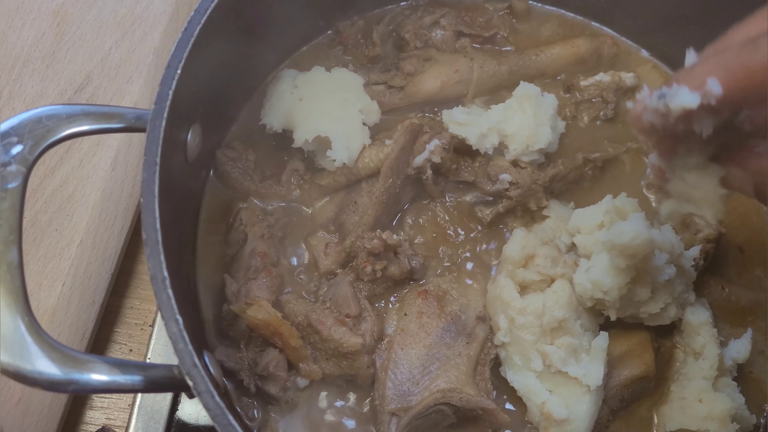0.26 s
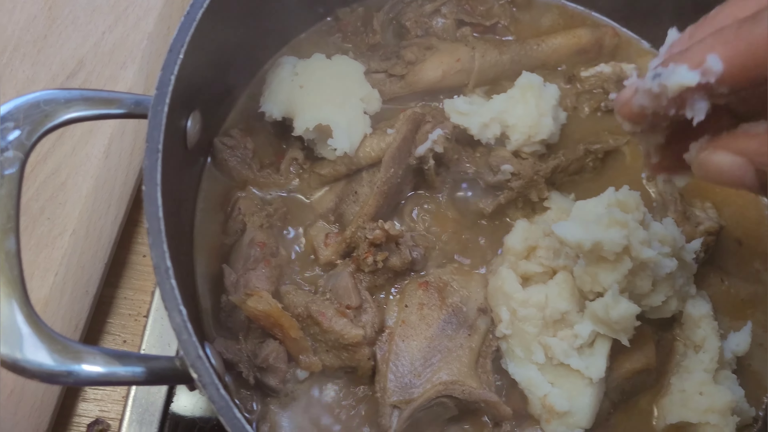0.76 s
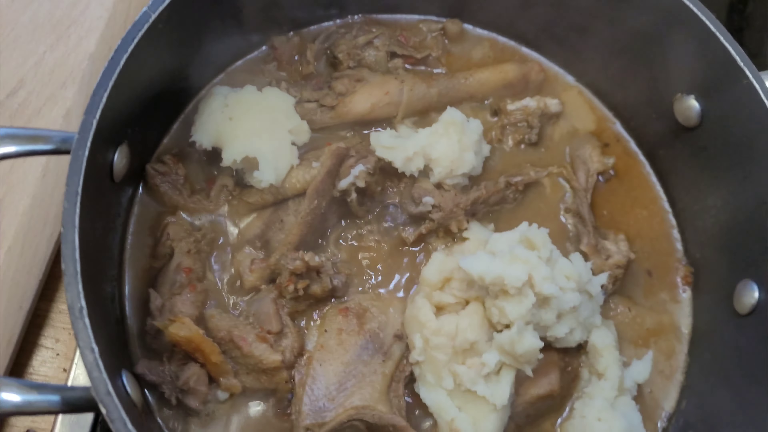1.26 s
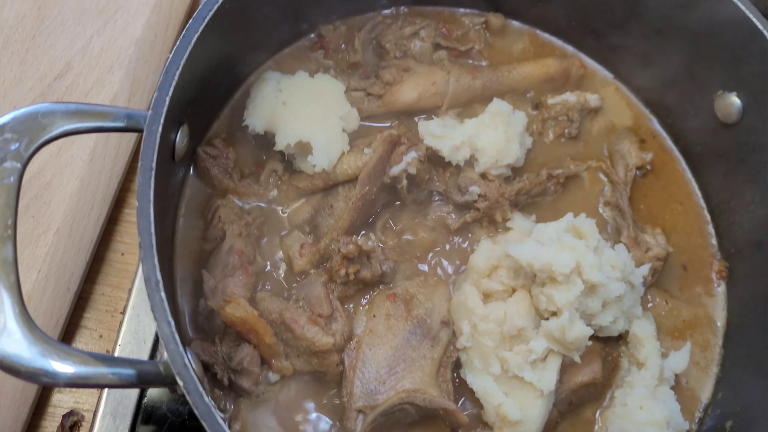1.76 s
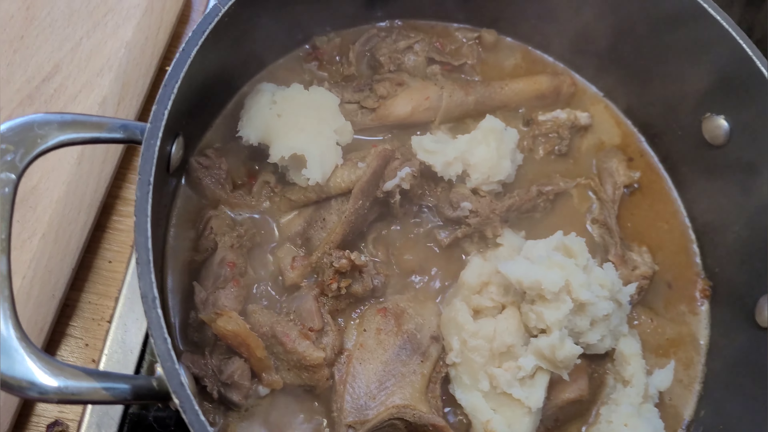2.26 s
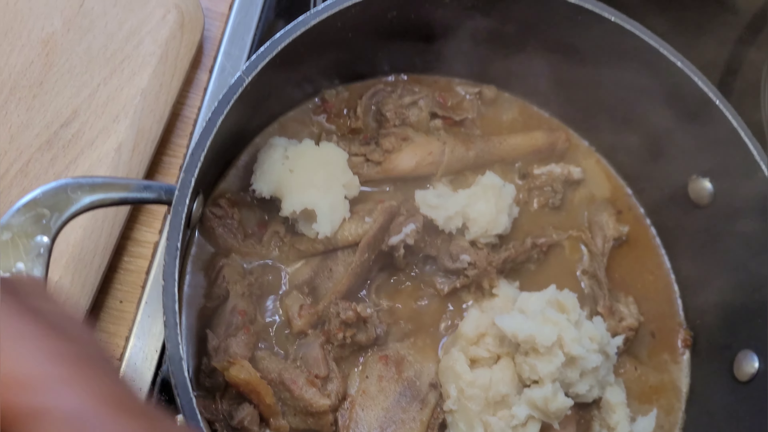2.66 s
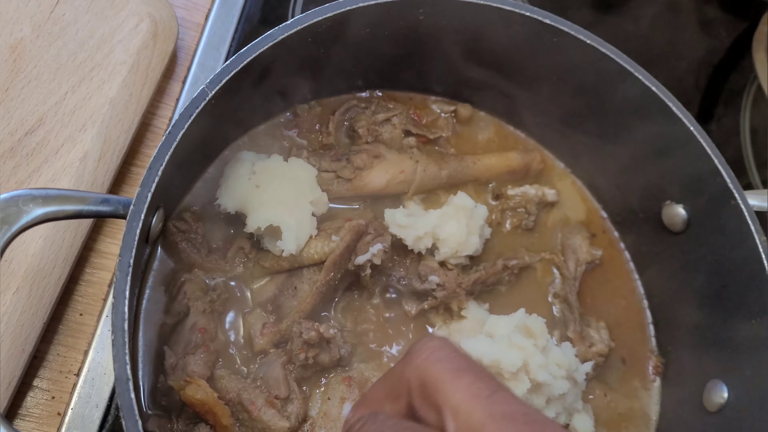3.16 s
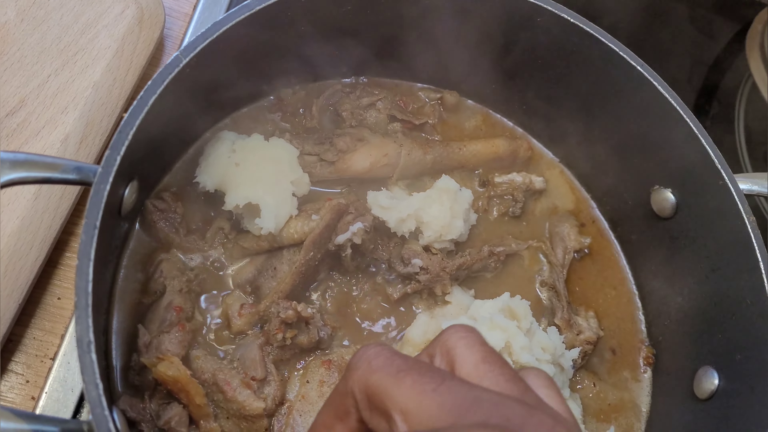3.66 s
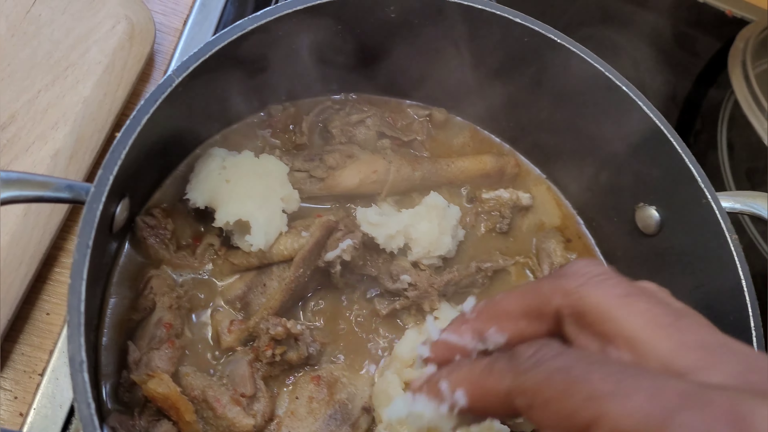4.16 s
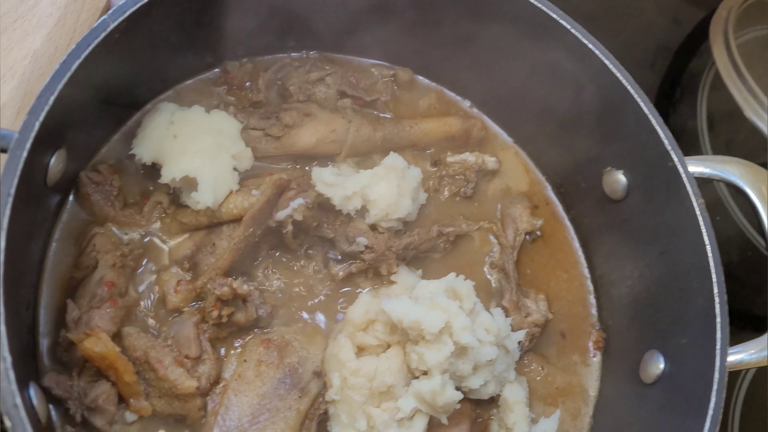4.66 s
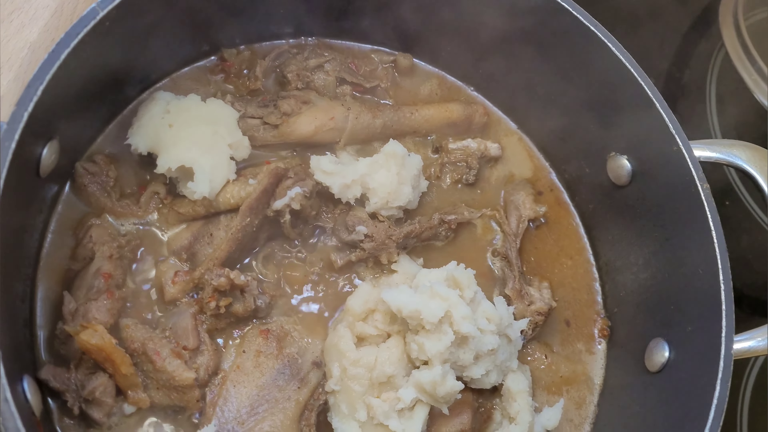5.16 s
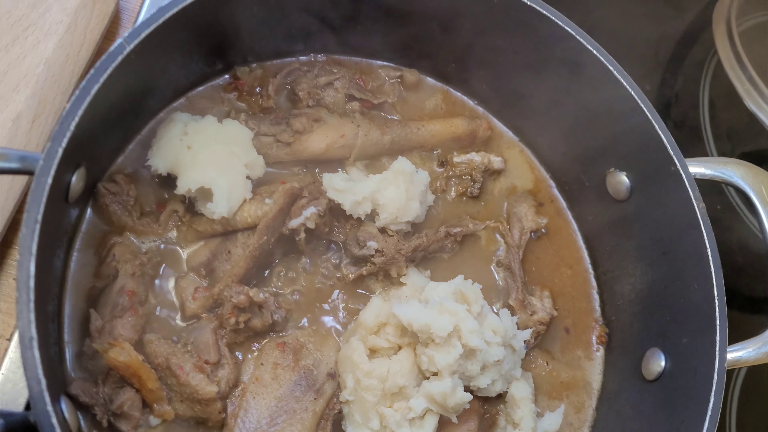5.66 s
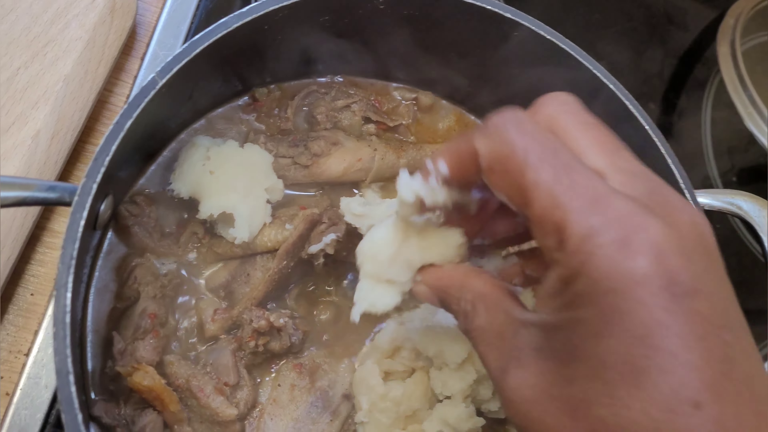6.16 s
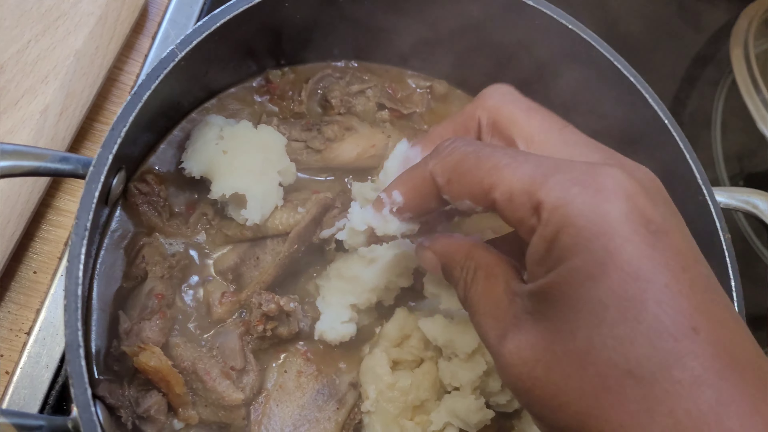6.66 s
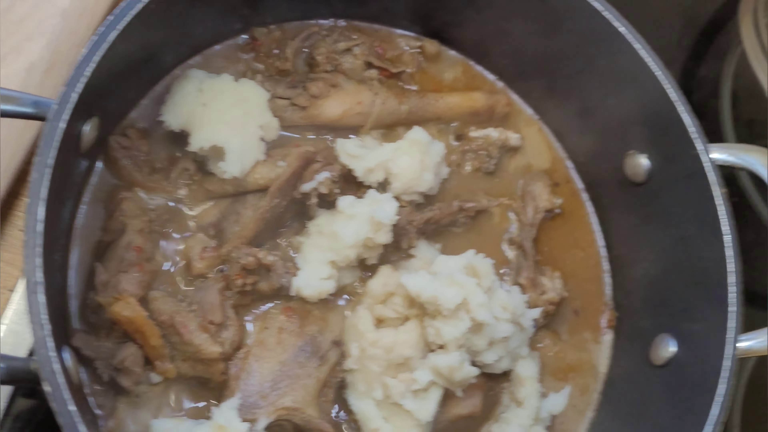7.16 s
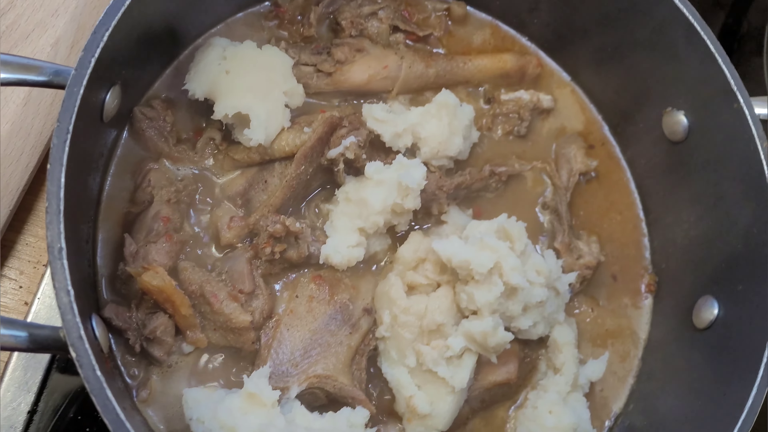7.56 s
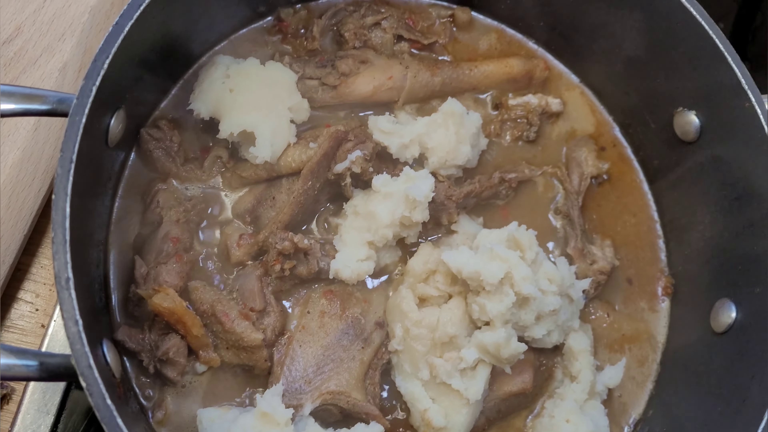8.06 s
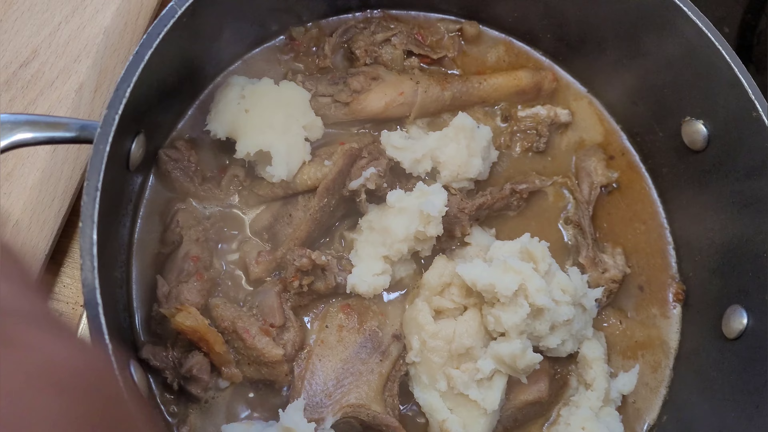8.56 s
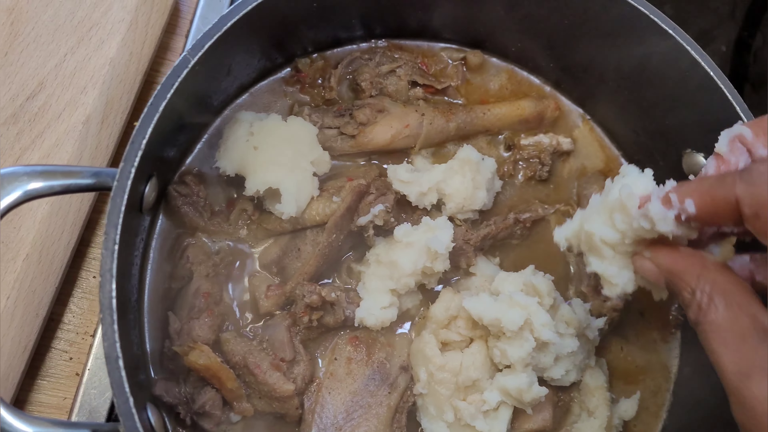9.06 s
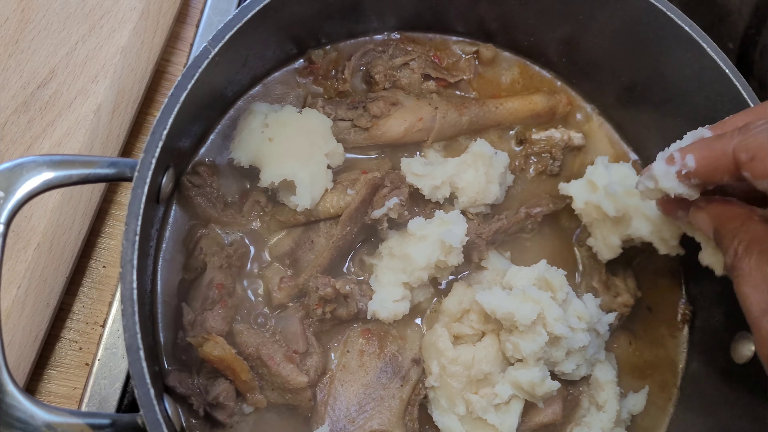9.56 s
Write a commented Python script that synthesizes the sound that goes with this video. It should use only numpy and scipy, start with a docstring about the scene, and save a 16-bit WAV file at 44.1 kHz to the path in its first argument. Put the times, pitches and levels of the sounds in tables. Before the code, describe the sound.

A thick soup simmers quietly in a steel pot, heard close up in stereo in a fairly dry home kitchen, over faint low house rumble. Throughout there is fine irregular crackle, short wet glugs in the low mids and small pings around two kilohertz that the pot briefly rings on. From 0 to 1.5 s scattered pops and pings are prominent; at about 1.6 s a dull, deep counter thud comes, followed by a dense sputter of bright spits and glugs to 1.9 s. Bubbling then continues loosely, with sharper spits near 3 s, and thins around 4 s. At 4.9 s the strongest soft thump lands, with a livelier boil and faint smaller knocks until 5.7 s. It calms near 6.5 s, bubbles again around 7.2 s, with thin steam hiss near 7.8 s. A firmer thud at 8.3 s precedes sparse, gentle simmering to the end. Treble leans left.

```python
"""A quiet simmer with a fine crackle throughout: thick soup in a steel pot, heard from close by in a kitchen.
Big vapour bubbles glug as short damped sines, small ones collapse with a ping that the pot rings on, and
bursting skins spit tiny puffs of noise. Dull thuds shake the counter as lumps of dough are handled.
Of the two microphone ports the left faces the pot: it gets more treble, and bubbles mostly a little earlier."""
import sys
import numpy as np
from scipy import signal
from scipy.fft import rfft, irfft, next_fast_len
from scipy.io import wavfile
from scipy.ndimage import uniform_filter1d, map_coordinates

SR = 44100
rng = np.random.default_rng(int(sys.argv[2]) if len(sys.argv) > 2 else 0)


def materialize(psi):
    """Save the field psi as 16-bit PCM at rate SR to the path in sys.argv[1].

    A 1-D psi becomes a single channel; in a 2-D psi each row is a channel.
    """
    bounded = np.clip(np.atleast_2d(psi).T, -1, 1)
    quanta = np.round(bounded * 32767).astype(np.int16)
    wavfile.write(sys.argv[1], SR, quanta)


N = 432621


def amp(db):
    """Decibels to gain."""
    return 10 ** (np.asarray(db) / 20)


def unit(x):
    """Scaled to rms 1."""
    return x / np.sqrt(np.mean(x ** 2) + 1e-20)


def along(points, hz):
    """Reads (frequency, value) points on a log frequency axis."""
    f, v = np.transpose(points)
    return np.interp(np.log(hz + 1), np.log(f + 1), v)


def wobble(rate):
    """A smooth random curve, rate knots a second."""
    knots = rng.standard_normal(int(N * rate / SR) + 4)
    return map_coordinates(knots, [np.arange(N) * rate / SR])


def filtered(x, response):
    """x times a complex response of frequency."""
    m = next_fast_len(N + SR // 2)
    return irfft(rfft(x, m) * response(np.fft.rfftfreq(m, 1 / SR)), m)[..., :N]


# Course of the simmer: (time [s], strength of the boil [dB], level of the treble fizz [dB])
SIMMER_COURSE = [(0.0, -57, -65), (0.44, -51, -58.5), (0.98, -56.5, -63), (1.74, -52, -58),
                 (1.91, -54.5, -58), (2.18, -53.5, -59.5), (3.0, -51, -58.5), (3.44, -53.5, -57.5),
                 (3.71, -54.5, -60), (4.42, -55.5, -63.5), (4.83, -53.5, -62), (5.13, -49.5, -55.5),
                 (5.73, -53, -60), (6.58, -59.5, -65.5), (7.23, -52.5, -60), (7.53, -59, -61.5),
                 (7.97, -56.5, -55), (8.22, -60, -59.5), (8.43, -49.5, -58), (8.65, -60.5, -59),
                 (8.98, -57.5, -59.5), (9.8, -60.5, -63.5)]


def curve(column):
    """One column of the simmer's course, a value per sample."""
    rows = np.array(SIMMER_COURSE)
    return np.interp(np.arange(N) / SR, rows[:, 0], rows[:, column])


# Likeness of diffuse sound at the two ports: (frequency [Hz], left-right correlation)
PORT_LIKENESS = [(60, 0.82), (130, 0.82), (640, 1), (1200, 0.06), (2000, 0.28), (4000, 0.22)]


def rush(spectrum, patchy_db):
    """Stereo noise of rms 1 with patches of random gain in time and pitch."""
    z = signal.stft(rng.standard_normal((2, N)), nperseg=256)[2]
    field = uniform_filter1d(rng.standard_normal(z.shape[1:]), 5, 0)
    field = uniform_filter1d(field, 6, 1)
    pair = signal.istft(z * amp(patchy_db * unit(field)), nperseg=256)[1][:, :N]

    def mid_side_gains(hz):
        turn = np.arccos(np.clip(along(PORT_LIKENESS, hz), -1, 1)) / 2
        return amp(along(spectrum, hz)) * [np.cos(turn), np.sin(turn)]

    mid, side = filtered(pair, mid_side_gains)
    return unit(np.array([mid + side, mid - side]))


def place(s, waves, lag_s, pan_db):
    """Sums one wave per time; the right port hears each lag_s later, the left pan_db louder."""
    out = []
    for side in (1, -1):
        start = np.round((s + (side < 0) * lag_s) * SR).astype(int)
        at = start[:, None] + np.arange(waves[0].shape[-1])
        wave = waves[int(side < 0)] * amp(side * pan_db / 2)[:, None]
        out.append(np.bincount(np.clip(at, 0, N).ravel(), wave.ravel(), N + 1)[:N])
    return np.array(out)


def crowd(boil, count, clump_db):
    """Times of small bursts, bunched where the boil surges, and their sizes: mostly near 0, seldom large."""
    odds = np.cumsum(amp(clump_db * boil))
    luck = rng.random((count, 2))
    times = np.interp(luck[:, 0], odds / odds[-1], np.arange(N) / SR)
    return times, -np.log(1 - luck[:, 1])


def share(bulk, spread_db, own_db, top_db):
    """How loud one part of each small burst is: its size plus some chance of its own."""
    return np.minimum(spread_db * bulk + own_db * rng.standard_normal(len(bulk)), top_db)


def sputter(rows, count, before_s, after_s, drop_db, detune):
    """Each burst brings a few weaker pops just before and after it."""
    s, db, hz = np.repeat(rows, count, axis=0).T
    luck = rng.random((len(rows), count, 3)).reshape(-1, 3)
    pop_s = s - before_s + (before_s + after_s) * luck[:, 0]
    pop_db = db - drop_db * (0.3 + luck[:, 1])
    return pop_s, pop_db, hz * np.exp(detune * (2 * luck[:, 2] - 1))


# Spectrum of the house rumble: (frequency [Hz], relative level [dB])
RUMBLE_SPECTRUM = [(15, -77), (25, -35), (54, 9.5), (96, -10), (129, 5), (179, -17.5), (200, -3), (260, -1),
                   (440, -120)]


def house_rumble():
    """Steady low noise of the house behind everything."""
    return amp(-64) * rush(RUMBLE_SPECTRUM, patchy_db=0.0)


# Decay of the kitchen: (frequency [Hz], t60 [s])
KITCHEN_DECAY = [(200, 0.15), (2000, 0.21), (10000, 0.006)]


def kitchen(x):
    """The room's answer, weak in the bass: noise in which each frequency dies at its own speed."""
    hz, t, z = signal.stft(rng.standard_normal((2, SR // 3)), SR, nperseg=256)
    decay = amp(-60 * t / along(KITCHEN_DECAY, hz)[:, None])
    tail = signal.istft(z * decay, SR, nperseg=256)[1]
    tail = tail / np.linalg.norm(tail[0])
    delayed = np.pad(x, (150, 0))  # samples before the answer begins
    room = signal.fftconvolve(delayed[None], tail, axes=1)[:, :N]
    return filtered(room, lambda hz: 1 / (1 + (150 / (hz + 1)) ** 2))


# Dough on the counter: (time [s], level [dB], hardness [dB per octave], floor shake below 100 Hz [dB])
DOUGH_THUDS = [(1.584, -25, -5, -3), (1.761, -46, 1, 10), (4.883, -20.5, -5, -4), (5.199, -52, -15, 5.5),
               (5.334, -42, -6, 2.5), (5.48, -36, -2.5, -6), (5.549, -55, -7, -2), (6.999, -56, 0.5, 2),
               (8.296, -25.5, -2.5, -8.5)]
# Ringing modes of the counter: (frequency [Hz], relative level [dB], t60 [s])
COUNTER_MODES = [(61.7, -3, 0.73), (80.3, 3.5, 0.49), (122.4, -6.5, 0.18), (131.4, 3, 0.35),
                 (148.7, -17, 0.46), (222.7, -5, 0.42), (269.4, -4, 0.42), (340, 1.5, 0.17),
                 (421, -10, 0.28)]


def thuds():
    """Each soft blow sets the counter's modes going; low ones swell more slowly, hard blows wake the high."""
    out = np.zeros((2, N + SR))
    t = np.arange(SR * 2 // 3) / SR
    for s, db, hard_db, shake_db in DOUGH_THUDS:
        ring = 0
        for hz, level, t60 in COUNTER_MODES:
            # the phase wanders at random, which roughens the tone
            drift = 4.7 * np.cumsum(rng.standard_normal(len(t))) / np.sqrt(SR)
            mode_db = level + hard_db * np.log2(hz / 100) + shake_db * (hz < 100)
            size = amp(mode_db + rng.normal(0, 0.3, (2, 1)) - 60 * t / t60)
            swell = (1 - np.exp(-t * hz / 1.54)) ** 2
            ring = ring + size * swell * np.sin(2 * np.pi * hz * t + drift + [[.25], [-.25]])
        # the wet, rough part
        slap = amp(4.6 * hard_db - 60 * t / 0.34) * (1 - np.exp(-t / 0.012)) * rng.standard_normal(len(t))
        slap = signal.sosfilt(signal.butter(2, [300, 1200], "bandpass", fs=SR, output="sos"), slap)
        out[:, round(s * SR):][:, :len(t)] += amp(db) * (ring + 2.1 * slap)
    return out[:, :N]


# Puffs of steam: (time [s], hold [s], level [dB])
STEAM_PUFFS = [(1.124, 0.65, -68.5), (1.69, 0.35, -70), (2.46, 0.51, -68), (3.5, 0.13, -70),
               (4.724, 0.66, -66.5), (6.722, 0.072, -68.5), (7.74, 0.36, -65), (8.77, .33, -69)]
# Spectrum of the steam: (frequency [Hz], relative level [dB])
STEAM_SPECTRUM = [(1800, -35), (2700, -3.5), (3400, -0.5), (4100, -6), (6000, -66)]
PUFF_ATTACK_S, PUFF_RELEASE_S = 0.045, 0.033


def steam_puffs():
    """Each puff of steam is band-shaped noise that swells, holds and fades."""
    t = np.arange(N) / SR
    swell = 0
    for s, hold_s, db in STEAM_PUFFS:
        release = PUFF_ATTACK_S + hold_s
        corners = [0, PUFF_ATTACK_S, release, release + PUFF_RELEASE_S]
        swell = swell + amp(db) * np.interp(t - s, corners, [0, 1, 1, 0])
    return swell * rush(STEAM_SPECTRUM, patchy_db=.7)


# Spectrum of the fizz, for spits and hiss: (frequency [Hz], relative level [dB])
FIZZ_SPECTRUM = [(2000, -2.5), (2900, -8), (3700, -4.5), (4400, -1.5), (6000, -6.5), (8000, -4),
                 (10000, -10), (15000, -10)]


def spits(s, db, hz, width, life_s, size):
    """Tiny puffs of noise around a centre pitch, partly different at each port."""
    luck = rng.standard_normal((len(s), 3))
    noise = rng.standard_normal((len(s), 3, size))
    f = np.fft.rfftfreq(size, 1 / SR) + 1
    band = 0.3 + np.exp(-(np.log(f / hz[:, None]) / width) ** 2)
    band = band * amp(0.85 * along(FIZZ_SPECTRUM, f))
    noise = irfft(rfft(noise) * band[:, None], size)
    noise = noise / noise.std(axis=2, keepdims=True)
    life = np.arange(size) / SR / (life_s * np.exp(.25 * luck[:, :1]))
    shape = amp(db)[:, None] * np.exp(-life) * (1 - np.exp(-life / 0.094))
    pair = [shape * (noise[:, 0] + 0.67 * noise[:, k]) for k in (1, 2)]
    return place(s, pair, np.abs(0.00036 + 0.000094 * luck[:, 1]), 4.3 * luck[:, 2])


# Loud spits of bursting skins: (time [s], level [dB], centre [Hz])
LOUD_SPITS = [(.0736, -50.5, 7300), (.2014, -44, 10580), (.22, -38, 5600), (0.256, -44.5, 11400),
              (0.517, -39, 10100), (.61, -61, 8070), (0.739, -38, 4200), (0.7524, -31.5, 5340),
              (1.0293, -40.5, 4180), (1.0423, -33.5, 5400), (1.312, -37.5, 6270), (1.5007, -42, 5800),
              (1.5045, -38, 7840), (1.647, -39, 6920), (1.659, -37, 13950), (1.671, -44, 13700),
              (1.679, -34, 14930), (1.696, -32, 6760), (1.7, -30, 9400), (1.7184, -33, 15000),
              (1.733, -33, 14630), (1.757, -40.5, 13010), (1.834, -35, 11960), (1.8993, -42, 8300),
              (2.8574, -39.5, 8900), (3.0203, -34, 7800), (3.0393, -31.5, 13200), (3.343, -41.5, 8250),
              (3.4703, -42.5, 8900), (3.4954, -38.5, 5600), (3.6063, -36, 3870), (4.0302, -36, 4030),
              (4.682, -42.5, 12200), (4.734, -42.5, 13200), (4.947, -38.5, 7940), (4.9683, -40, 5400),
              (5.079, -42, 6370), (5.092, -33, 8000), (5.105, -40, 4320), (5.1374, -39.5, 7040),
              (5.3134, -41.5, 10700), (5.413, -37, 8400), (5.4235, -33.5, 8350), (5.6285, -38.5, 4150),
              (6.029, -41, 8300), (6.1, -54, 5060), (6.1624, -41, 15200), (6.47, -43, 4430),
              (6.65, -46, 4800), (6.749, -41, 4160), (6.98, -38.5, 7500), (7.0732, -41, 4600),
              (7.2, -35.5, 4550), (7.231, -41, 4530), (7.2992, -35.5, 4700), (7.3277, -37, 7400),
              (7.727, -41.5, 13700), (8.0158, -35, 3660), (8.086, -35, 14400), (8.218, -34.5, 4430),
              (8.2265, -40, 7240), (8.2486, -41.5, 14590), (8.3538, -42, 11720), (8.3994, -51, 7500),
              (8.4449, -41, 4870), (8.656, -39.5, 7240), (8.9023, -45, 4500), (9.0616, -39.5, 11800),
              (9.415, -44, 11400), (9.4987, -40, 4700), (9.509, -39.5, 4900)]


def fizz(small_s, bulk, boil):
    """Bursting skins: loud spits that sputter, over a crackle of small ones and a thin hiss."""
    s, db, hz = np.transpose(LOUD_SPITS)
    loud = spits(s, db, hz, width=0.13, life_s=0.00095, size=256)
    pops = sputter(LOUD_SPITS, count=4, before_s=.007, after_s=.012, drop_db=11, detune=.5)
    loud = loud + spits(*pops, width=0.29, life_s=0.0012, size=256)
    small_hz = np.clip(8500 * np.exp(.5 * rng.standard_normal(len(bulk))), 4000, 15500)
    small_db = share(bulk, spread_db=3.5, own_db=5.5, top_db=16)
    crackle = unit(spits(small_s, small_db, small_hz, width=0.33, life_s=0.0011, size=128))
    hiss = amp(-5.5 + 2.4 * boil) * rush(FIZZ_SPECTRUM, patchy_db=2)
    return loud + amp(curve(2)) * unit(crackle + hiss)


# Resonances of the steel pot: (frequency [Hz], width [Hz], level [dB])
POT_MODES = [(242, 10.3, 6), (358, 350, -6.5), (651, 177, 3), (1131, 180, -5), (1870, 130, 2),
             (2140, 240, -3.5)]


def pot(f):
    """Response of the pot: the direct sound plus its resonances."""
    modes = sum(amp(db) * 1j * f * w / (c * c - f * f + 1j * f * w) for c, w, db in POT_MODES)
    return 0.25 + modes


def bubbles(s, db, hz, cycles, rise, swell, size):
    """Damped sines that live some cycles while their pitch climbs, rung on by the pot."""
    luck = rng.standard_normal((len(s), 3))
    turns = np.arange(size) / SR * hz[:, None]
    life = turns / (cycles * np.exp(.25 * luck[:, :1]))
    wave = np.sin(2 * np.pi * turns * (1 + rise * np.minimum(life, 2)))
    wave = wave * np.exp(-life) * (1 - np.exp(-turns / swell))
    wave = wave * (amp(db) / np.abs(pot(hz)))[:, None]  # offsets the pot's gain at this pitch
    return filtered(place(s, [wave, wave], 9e-5 + 6e-5 * luck[:, 1], 3.1 * luck[:, 2]), pot)


# Loud pings: (time [s], level before the drive [dB], pitch [Hz])
LOUD_PINGS = [(0.1337, -37.5, 1810), (0.196, -25.5, 1860), (0.408, -37.5, 1940), (0.4224, -39, 2290),
              (0.5213, -37, 1930), (0.6432, -31, 1823), (0.6588, -32.5, 2100), (0.7792, -39, 1860),
              (1.0045, -33.5, 1880), (1.0265, -28, 2280), (1.138, -29.5, 2060), (1.2873, -32.5, 1834),
              (1.3598, -30, 2190), (1.4775, -39.5, 1920), (1.6792, -33, 1860), (1.7004, -45, 2170),
              (1.717, -40, 2430), (1.8643, -30, 1883), (2.0203, -43.5, 1880), (2.0663, -39, 1880),
              (2.177, -37.5, 1900), (2.195, -34.5, 1870), (2.2165, -37.5, 2330), (2.3583, -39, 1900),
              (2.3854, -38.5, 2050), (2.4488, -39, 1910), (2.4673, -25, 2100), (2.596, -39, 1950),
              (2.9776, -40.5, 1950), (3.177, -41, 1890), (3.1857, -39, 2000), (3.3754, -34, 1950),
              (3.5519, -33, 1860), (3.833, -42, 1930), (4.0292, -35.5, 2070), (4.39, -43.5, 1770),
              (4.5441, -36.5, 1770), (4.8778, -41.5, 1840), (4.9206, -42.5, 1850), (4.9412, -41, 1870),
              (4.9537, -35, 2050), (5.055, -45, 1860), (5.088, -43, 1840), (5.124, -37, 2180),
              (5.14, -45, 2010), (5.3133, -45.5, 1850), (5.3627, -45, 1840), (5.4966, -32, 1890),
              (5.5563, -32.5, 1920), (5.6481, -36, 1870), (5.8, -33, 1840), (6.1802, -46, 1790),
              (6.2567, -42, 1765), (7.089, -37.5, 1850), (7.198, -44, 2010), (7.3602, -41.5, 1900),
              (7.8861, -29, 2000), (8.3624, -34.5, 2020), (8.519, -39, 1950), (8.8935, -42.5, 1920),
              (9.3132, -44.5, 1930), (9.4398, -38.5, 2000), (9.657, -46.5, 2000)]
PING_DRIVE_DB = 6.5  # a short bubble must push the pot this much harder to reach its peak
# small pings: level at the start for a mean boil, swing over the boil's, slow thinning
PING_DB, PING_GROWS, PING_FADES_DB_PER_S = -70, 1.13, 0.94


def pings(small_s, bulk):
    """Small bubbles collapse near the pitch at which the pot rings best, often a few together."""
    s, db, hz = np.transpose(LOUD_PINGS)
    loud = bubbles(s, db + PING_DRIVE_DB, hz, cycles=3.1, rise=0.0072, swell=0.21, size=900)
    pops = sputter(LOUD_PINGS, count=3, before_s=.002, after_s=.008, drop_db=5, detune=.22)
    loud = loud + bubbles(*pops, cycles=1.37, rise=0.2, swell=0.043, size=600)
    small_hz = 2000 * np.exp(0.15 * rng.standard_normal(len(bulk)))
    small_db = share(bulk, spread_db=4.5, own_db=4, top_db=16)
    small = unit(bubbles(small_s, small_db, small_hz, cycles=1.3, rise=.03, swell=.4, size=400))
    boil_db = curve(1)
    swing_db = PING_GROWS * (boil_db - boil_db.mean())
    return loud + amp(PING_DB + swing_db - PING_FADES_DB_PER_S * np.arange(N) / SR) * small


# Loud glugs: (time [s], level before the drive [dB], pitch [Hz])
LOUD_GLUGS = [(0.194, -37, 490), (0.338, -45, 497), (0.478, -31, 525), (0.641, -41, 660), (1.138, -35, 615),
              (1.286, -30, 660), (1.326, -32, 660), (1.36, -37, 651), (1.499, -30, 1190), (1.594, -27, 401),
              (1.657, -30.5, 665), (1.688, -30, 670), (1.697, -23.5, 1160), (1.717, -37, 650),
              (2.069, -35.5, 605), (2.468, -37, 630), (2.684, -37.5, 644), (3.016, -31.5, 678),
              (3.089, -39.5, 630), (3.174, -34.5, 640), (3.315, -37, 520), (3.325, -39.5, 638),
              (3.343, -29.5, 585), (4.89, -33, 398), (5.053, -38, 624), (5.086, -30, 650),
              (5.199, -45, 650), (5.266, -33, 630), (5.363, -42, 494), (5.417, -28, 738), (5.494, -34, 390),
              (5.555, -39, 620), (5.636, -34.5, 630), (6.978, -36, 415), (7.041, -33.5, 646),
              (7.249, -43.5, 598), (7.297, -32.5, 1210), (7.328, -34, 1220), (7.462, -36.5, 574),
              (7.5, -43, 624), (7.516, -39.5, 670), (8.225, -37, 626), (8.297, -26.5, 386),
              (8.548, -35, 620), (9.086, -33, 590), (9.384, -43, 590), (9.408, -40, 607),
              (9.478, -37.5, 630), (9.513, -31.5, 716)]
# Spectrum of the soup's stir: (frequency [Hz], relative level [dB])
STIR_SPECTRUM = [(100, -44), (170, -49), (252, -2.5), (310, -5.5), (507, -8), (625, 1.5), (903, -19.5),
                 (1170, -15.5), (1570, -33), (2010, -11), (2630, -32.5), (3200, -24.5), (4160, -91),
                 (7040, -120)]
GLUG_DRIVE_DB = 6.5  # a short bubble must push the pot this much harder to reach its peak


def gurgle(small_s, bulk, boil):
    """Loud glugs that sputter, higher ones ringing more cycles, over short dry pops and the soup's stir."""
    s, db, hz = np.transpose(LOUD_GLUGS)
    cycles = 0.48 * (hz[:, None] / 640) ** 1.46
    loud = bubbles(s, db + GLUG_DRIVE_DB, hz, cycles=cycles, rise=0.0068, swell=0.079, size=800)
    pops = sputter(LOUD_GLUGS, count=4, before_s=.004, after_s=.012, drop_db=4, detune=.7)
    loud = loud + bubbles(*pops, cycles=1.0, rise=0.21, swell=0.071, size=800)
    small_hz = np.clip(650 * np.exp(0.542 * rng.standard_normal(len(bulk))), 260, 2500)
    small_db = share(bulk, spread_db=4.5, own_db=3, top_db=15)
    small = unit(bubbles(small_s, small_db, small_hz, cycles=.6, rise=.1, swell=.1, size=600))
    stir = amp(-3 + 1.2 * boil) * rush(STIR_SPECTRUM, patchy_db=4.8)
    return loud + amp(curve(1)) * unit(small + stir)


def scene():
    """House rumble, the counter and the soup close by, and the kitchen's answer."""
    boil = unit(wobble(5) + wobble(11) + .7 * wobble(35))
    # the same small bursts feed the fizz, the pings and the gurgle
    small_s, bulk = crowd(boil, count=2600, clump_db=6)
    soup = steam_puffs() + fizz(small_s, bulk, boil) + pings(small_s, bulk) + gurgle(small_s, bulk, boil)
    near = thuds() + soup
    room = amp(-14) * kitchen(near.mean(axis=0))
    return house_rumble() + room + near


# Tilt between the ports: (frequency [Hz], left over right [dB])
PORT_TILT = [(60, -1), (130, .5), (250, 1), (600, 0), (1200, 5.5), (2400, 5.2), (4400, 7), (16000, 7)]
TOP_HZ = 15950  # band limit


def record(dry):
    """The left port is brighter, the deepest bass is lost and nothing is kept above the band limit."""
    def response(hz):
        tilt = amp(along(PORT_TILT, hz) / [[2], [-2]])  # half to each port
        bass_loss = 1 / (1 + (30 / (hz + 1)) ** 4)
        return tilt * bass_loss * (hz < TOP_HZ)

    return filtered(dry, response)


dry = scene()
out = record(dry)
materialize(out)
```